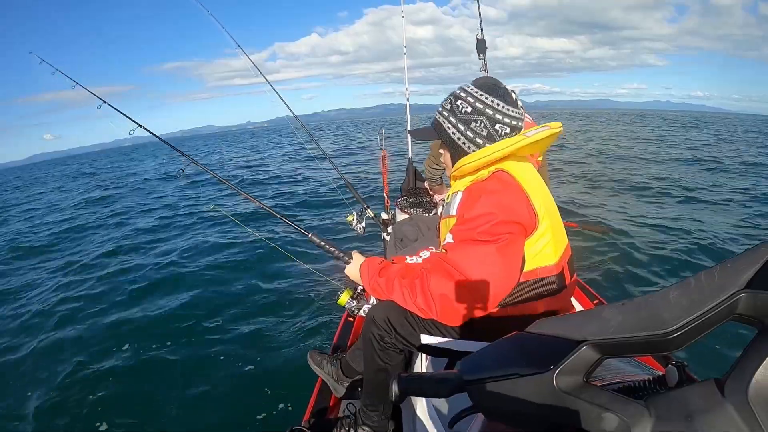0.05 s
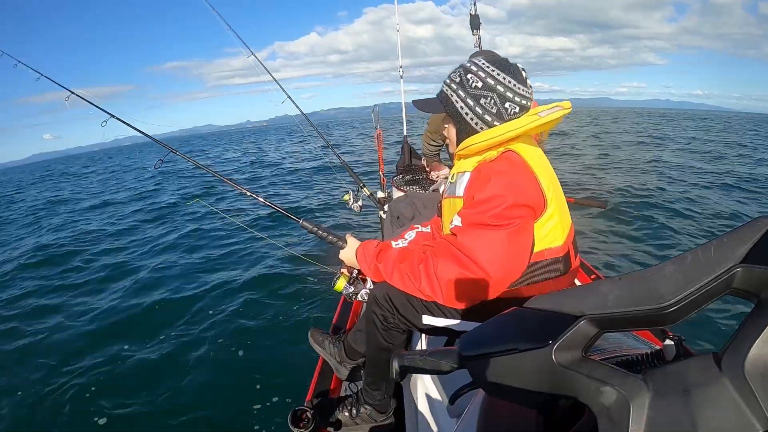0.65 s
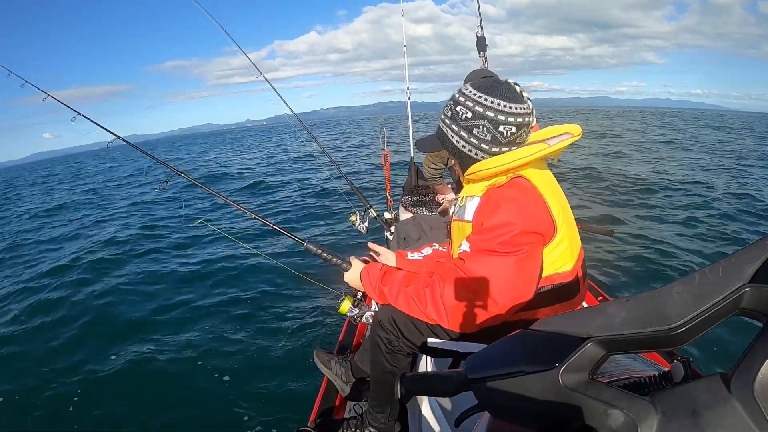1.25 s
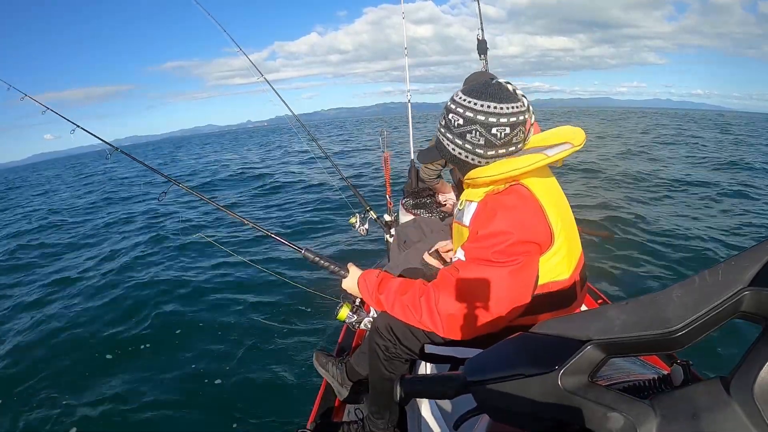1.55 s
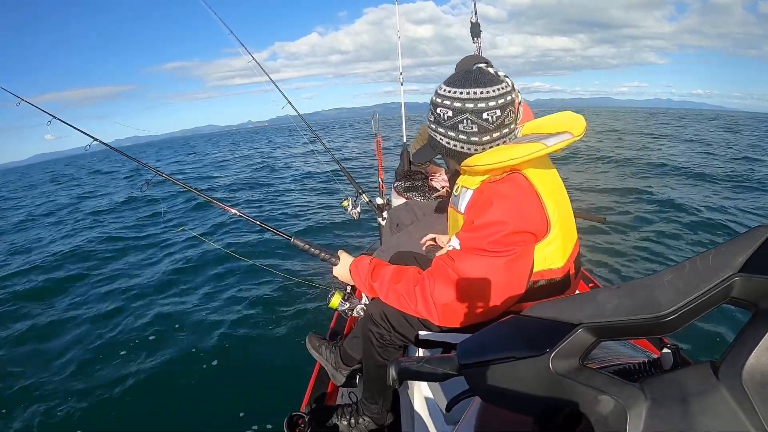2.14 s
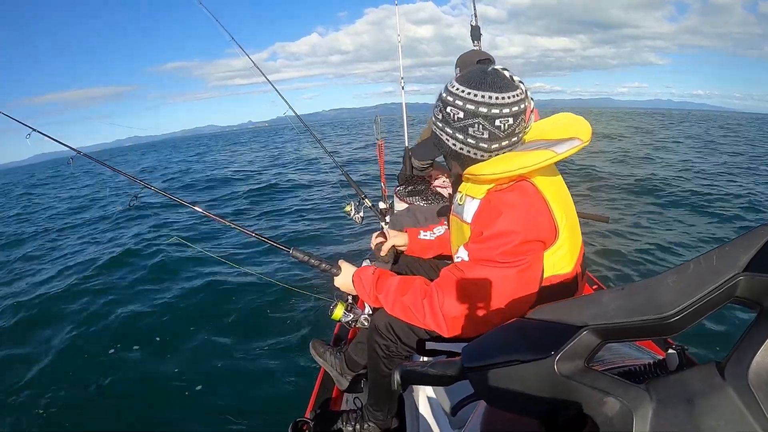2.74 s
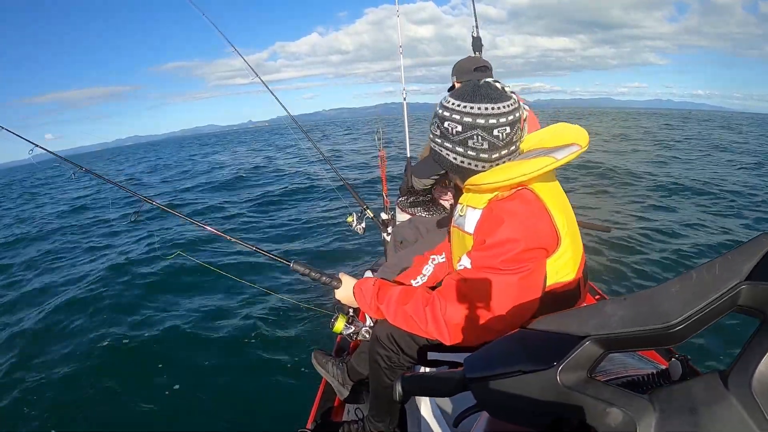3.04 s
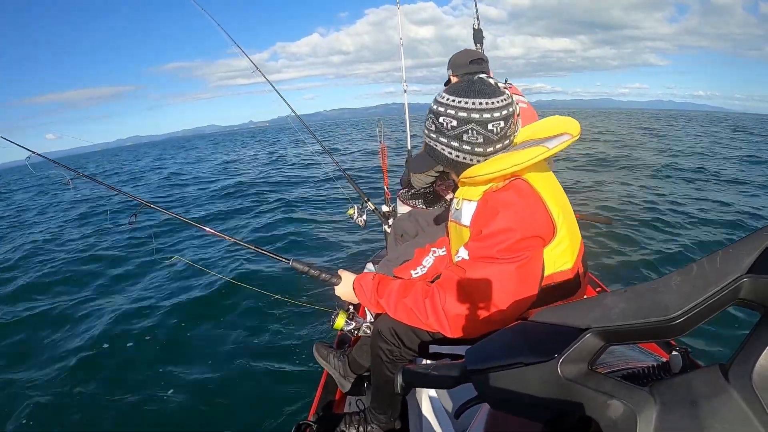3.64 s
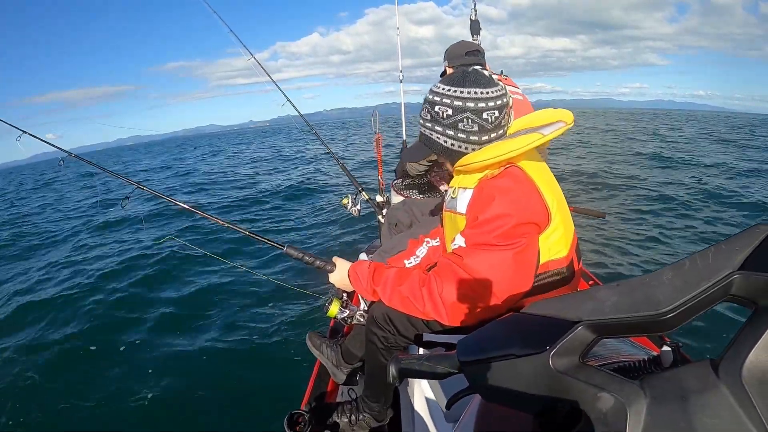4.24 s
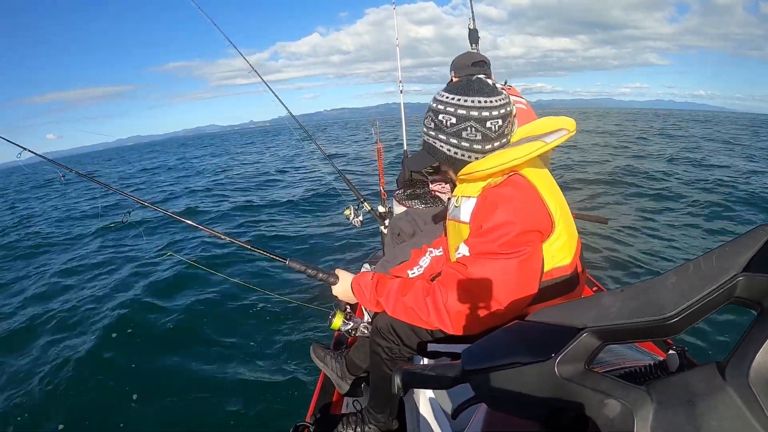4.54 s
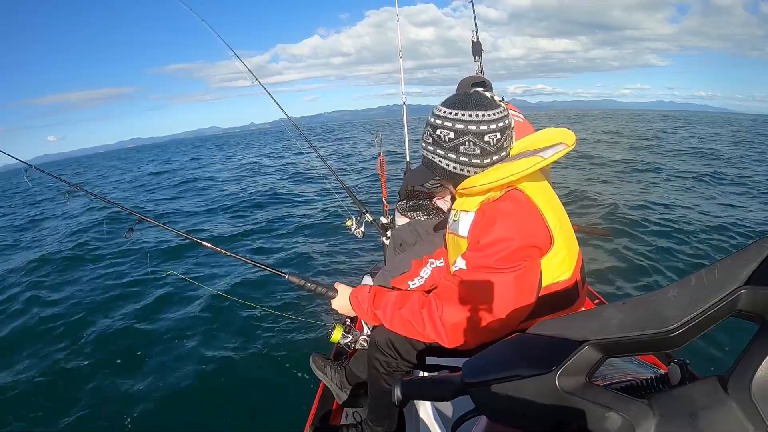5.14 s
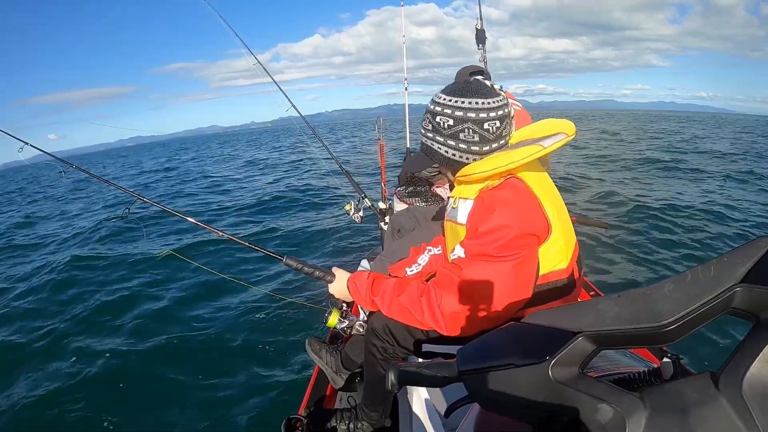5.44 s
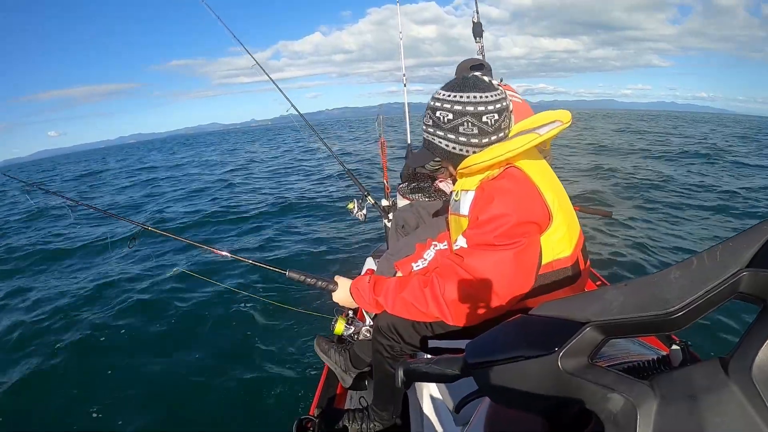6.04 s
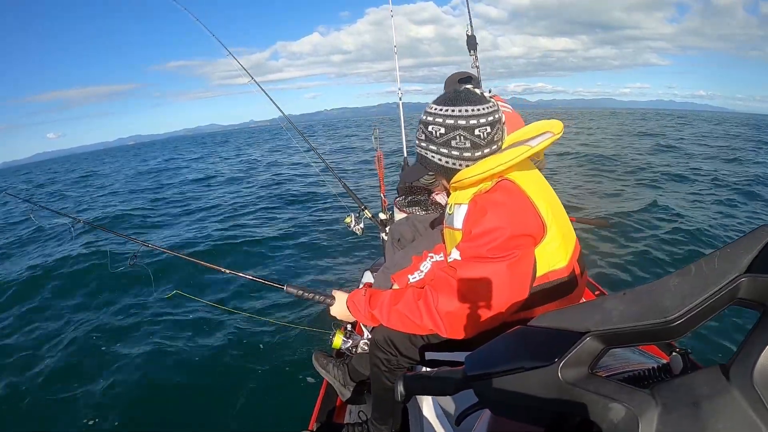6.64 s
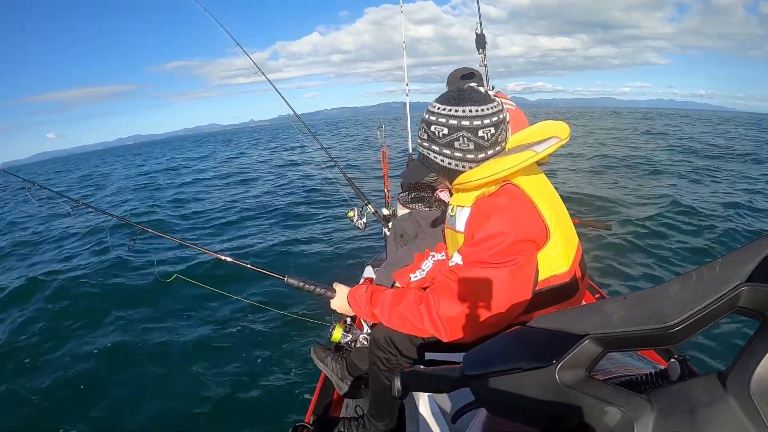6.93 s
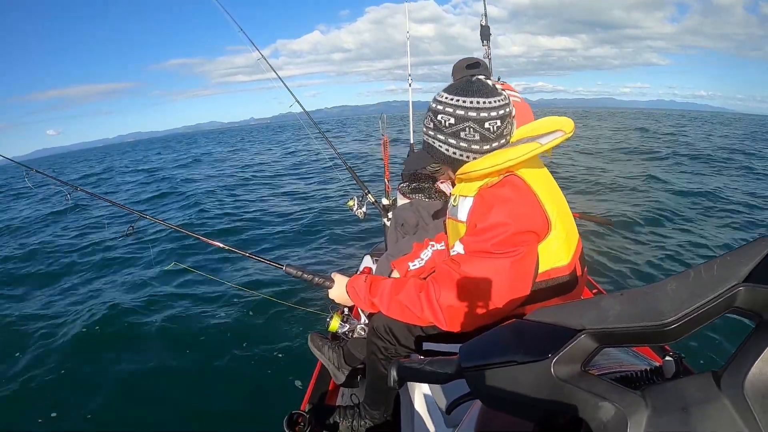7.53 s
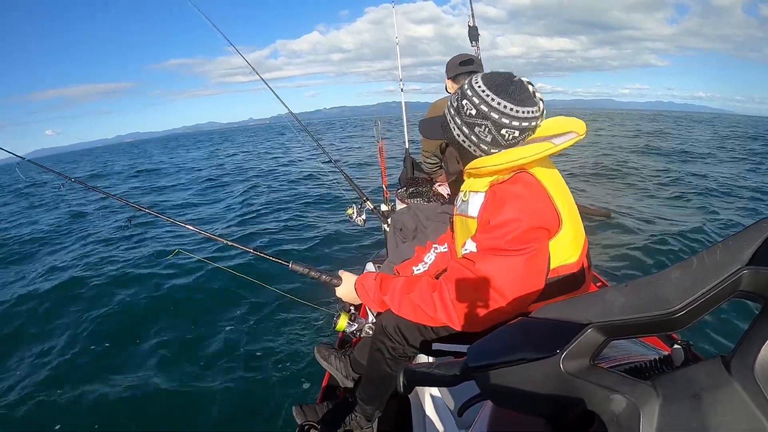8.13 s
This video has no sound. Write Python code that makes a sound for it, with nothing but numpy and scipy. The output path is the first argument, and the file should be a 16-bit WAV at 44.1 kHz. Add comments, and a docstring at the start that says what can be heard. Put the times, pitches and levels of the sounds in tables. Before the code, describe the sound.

Wind buffets the microphone in uneven low gusts as sea water laps close by against a small boat. Sharp little splashes, plops and hollow glugs arrive in loose clusters over soft gurgling and fizzing. After two early slaps there is a lull with dull wind thumps, then the water grows busier, hits hardest in the second half and goes on knocking at the hull to the end.

```python
"""A small craft drifts on a choppy sea, engine off. From the start wind buffets the microphone,
foam fizzes and water gurgles. Wavelets slap the hull: each throws a crackle of small bubbles,
then traps a pocket of air that knocks and glugs. Strong slaps land near 1 s and 2 s; a lull follows,
with eddies thumping the microphone. Slaps bunch again at 4.5-5 s, hardest at 6.1-6.5 s,
and keep coming until 8.3 s."""
import sys
import numpy as np
from scipy import signal
from scipy.fft import rfft, irfft, next_fast_len
from scipy.io import wavfile
from scipy.ndimage import uniform_filter1d

SR = 44100
rng = np.random.default_rng(int(sys.argv[2]) if len(sys.argv) > 2 else 0)


def transcribe(u):
    """Save the signal u as a 16-bit wav file named by the first command-line argument.

    u: samples, shape (n,) or (channels, n), limited to [-1, 1]; the rate is SR.
    q: integer samples, one column per channel.
    """
    v = np.clip(np.atleast_2d(u).T, -1, 1)
    q = np.round(v * 32767).astype(np.int16)
    wavfile.write(sys.argv[1], SR, q)


N = 369558
TIME_S = np.arange(N) / SR
BINS_HZ = np.maximum(np.fft.rfftfreq(next_fast_len(N + 8192, real=True) // 2 * 2, 1 / SR), 1)
SIDES = np.array([[1], [-1]])  # left, right microphone port

# Source spectra: freq_hz, density_db
RIPPLE_SPECTRUM = [(180, 15), (300, 2.5), (637, -11), (814, -6), (1060, -5), (1440, -2.5), (1910, -11),
                   (2280, -25.5), (8460, -22.5), (12500, -50), (15000, -43)]
EDDY_SPECTRUM = [(11, -34), (18, 0), (34, -1), (56, -3), (78, -6), (168, -22), (215, -45), (292, -47),
                 (391, -55), (648, -53), (700, -55), (910, -68), (1540, -120)]
FOAM_SPECTRUM = [(2200, 2.5), (3300, 2.5), (5000, 0.5), (6500, -5), (8300, -9.5), (10500, -18),
                 (15000, -27)]
GURGLE_SPECTRUM = [(500, -3), (800, -7), (1100, 6.5), (1600, 3.5), (2300, 0.5), (3300, -9.5), (4500, -28)]
BOOM_SPECTRUM = [(70, -2.5), (105, -6), (150, -13.5), (220, -20)]
SLOSH_SPECTRUM = [(110, 1.5), (170, 3.5), (280, -3), (450, -8.5), (700, -22.5), (1000, -27)]
SPRAY_SPECTRUM = [(3000, 10), (4200, 4.5), (6000, -6), (8000, -7), (11000, -19.5), (15000, -54)]
SPLASH_SPECTRUM = [(600, 1), (1000, 3), (1700, 8), (2500, 0.5), (3500, -8), (5000, -27.5)]
# Shading between ports: freq_hz, left_minus_right_db
PORT_SHADING = [(250, -1.5), (1000, -1), (2000, 0.8), (4000, 1), (8000, -3.5), (13000, -3.5)]
# Water sound reaches the right port first: freq_hz, lead_rad
RIGHT_LEAD = [(200, .06), (1000, 0.067), (2000, 0.72), (4000, 0.73), (8000, 1)]
# Deck reflections against direct sound: freq_hz, gain_db
DECK_SCATTER = [(150, -36.5), (500, -18.5), (1000, -14), (2000, -18.5), (4000, -20), (8000, -25),
                (13000, -1.5)]

# Levels below are relative within each table.
# Wind strength: time_s, level_db
GUSTS = [(0.0, -46), (0.09, -34.5), (1.12, -32.5), (1.98, -44.5), (2.31, -30), (2.45, -35.5), (2.63, -24.5),
         (2.66, -35.5), (2.78, -40), (3.38, -29.5), (3.62, -41), (3.66, -32.5), (4.34, -38.5),
         (4.46, -29.5), (4.95, -38.5), (5.06, -31), (5.23, -55), (5.41, -39.5), (6.51, -35), (7.12, -37),
         (7.14, -30.5), (7.89, -32), (7.96, -25), (8.12, -45), (8.19, -32.5), (8.38, -50)]
# Single eddies: centre_s, level_db, half_width_s
EDDY_THUMPS = [(2.353, -17.5, 0.0048), (2.622, -21, 0.0035), (3.205, -16, 0.0085), (3.31, -16.5, 0.0031),
               (5.055, -9.5, 0.0044), (5.844, -14, 0.008), (6.409, -13.5, 0.009), (7.328, -29, 0.0086),
               (7.959, -14, 0.0044)]
# Waves along the hull: crest_s, level_db, swell_s, drain_s, foam_offset_db
HULL_WAVES = [(0.17, -67.5, 0.2, 0.13, 3), (0.76, -65, 0.09, 0.052, -1), (0.991, -60.5, 0.097, 0.097, 2),
              (1.56, -68.5, 0.24, 0.18, -5), (2.03, -58, 0.28, 0.052, -1), (2.92, -56.5, 0.25, 0.36, -6.5),
              (3.08, -64.5, 0.011, 0.11, 1.5), (3.73, -64, 0.057, 0.14, -15.5),
              (2.47, -67, 0.04, 0.043, -7), (4.25, -77.5, 0.094, 0.13, -17), (6.85, -71, 0.092, 0.06, -0.5),
              (4.58, -81, 0.12, 0.1, 5), (4.95, -59, 0.24, 0.12, -3.5), (5.78, -62, 0.13, 0.17, -12),
              (6.218, -54, 0.061, 0.15, -4.5), (6.45, -62, 0.22, 0.072, -15),
              (7.19, -56.5, 0.16, 0.17, -12), (7.57, -54.5, 0.14, 0.27, -8.5),
              (8.25, -55.5, 0.16, 0.12, -11)]
# Closing cavities: start_s, level_db, first_hz, last_hz, length_s
CAVITIES = [(0.192, -44, 451, 724, 0.044), (0.229, -38.5, 793, 2250, 0.026),
            (0.626, -52.5, 918, 1365, 0.041), (1.387, -51, 1100, 1360, 0.028),
            (1.517, -50.5, 1467, 1750, 0.066), (1.988, -27, 870, 1116, 0.019),
            (2.4, -48.5, 874, 1000, 0.025), (3.43, -45, 463, 570, 0.043), (4.015, -60.5, 718, 1010, 0.14),
            (4.075, -60, 1225, 1590, 0.055), (4.516, -32, 563, 623, 0.013), (4.819, -36.5, 668, 780, 0.045),
            (4.178, -56, 850, 1450, 0.051), (5.108, -49, 1410, 4230, 0.02), (5.245, -52.5, 714, 990, 0.054),
            (7.503, -35.5, 696, 710, 0.034), (8.267, -32.5, 3360, 6100, 0.0053)]
# Heavy water on the hull: crest_s, level_db, fade_s
HULL_HEAVES = [(1.14, -31, 0.059), (4.52, -40, 0.14), (6.13, -36, 0.073), (6.389, -30, 0.048),
               (7.34, -35.5, 0.028), (7.6, -39, 0.055), (7.94, -39, 0.037)]
# Air trapped under the hull: start_s, level_db, pitch_hz, t60_s
AIR_POCKETS = [(0.143, -28, 317, 0.15), (0.389, -25, 394, 0.034), (0.879, -25, 474, 0.066),
               (0.99, -28.5, 319, 0.086), (1.022, -11.5, 249, 0.079), (1.051, -31, 237.3, 0.28),
               (1.122, -28, 217, 0.099), (1.17, -29.5, 169, 0.16), (1.847, -24.5, 364, 0.044),
               (1.965, -25, 222, 0.088), (2.098, -26.5, 393, 0.047), (2.882, -31, 230, 0.08),
               (3.411, -30.5, 219, 0.18), (3.676, -28.5, 280, 0.041), (4.002, -40, 547, 0.15),
               (4.412, -28.5, 171, 0.1), (4.523, -20, 316.4, 0.086), (4.66, -27, 147.6, 0.16),
               (4.736, -41.5, 313, 0.45), (4.797, -27, 555, 0.081), (4.824, -32.5, 304, 0.11),
               (5.022, -28.5, 345, 0.035), (5.263, -35.5, 614, 0.054), (5.438, -33, 454, 0.032),
               (6.11, -26.5, 275, 0.047), (6.137, -31, 232, 0.091), (6.231, -38, 286, 0.12),
               (6.383, -24, 230, 0.08), (6.434, -37, 338, 0.07), (6.764, -30.5, 185.5, 0.12),
               (6.95, -34, 487, 0.035), (7.149, -26.5, 302, 0.068), (7.322, -29, 174, 0.12),
               (7.513, -22.5, 560, 0.047), (7.553, -30, 340, 0.076), (7.778, -33, 285.5, 0.17),
               (8.015, -33.5, 462, 0.12)]
# Small bubbles snapping shut: start_s, level_db, pitch_hz
PINCH_OFFS = [(0.3653, -33, 1610), (0.8692, -33.5, 1300), (0.9953, -24.5, 1420), (1.8829, -30.5, 1920),
              (1.9109, -33.5, 1440), (1.9948, -16, 1540), (1.997, -26, 1000), (1.998, -21.5, 2880),
              (1.9655, -36, 1700), (2.447, -48, 2270), (2.8814, -33, 1780), (2.928, -28.5, 1510),
              (2.966, -29, 2350), (3.656, -37, 2020), (4.5113, -21, 1360), (4.6482, -19.5, 1550),
              (4.6558, -20, 2070), (4.784, -27, 1730), (4.7942, -20.5, 1670), (4.8288, -28, 1660),
              (4.9367, -30, 1080), (5.0466, -29.5, 1780), (6.1306, -14, 1610), (6.13, -44, 3260),
              (5.817, -41, 2400), (6.1483, -20, 1380), (6.1556, -19, 1460), (6.1934, -26.5, 1630),
              (6.3616, -24.5, 1050), (6.3777, -21, 1900), (6.4442, -23, 1040), (6.452, -13.5, 1620),
              (6.996, -33, 1140), (7.027, -41.5, 1940), (7.097, -38.5, 930), (7.1518, -29.5, 2650),
              (7.218, -35.5, 746), (7.2489, -30.5, 945), (7.405, -35, 2090), (7.45, -36.5, 1200),
              (7.6292, -29.5, 1630), (7.6421, -23.5, 2580), (7.9272, -19.5, 1500), (8.0115, -35, 1340),
              (8.251, -23, 1850), (8.2853, -23, 1810), (8.298, -27, 1660)]
# Wavelets breaking on the hull: crest_s, level_db, swell_s, fade_s, slosh_offset_db, spray_offset_db
WAVELETS = [(0.018, -50, 0.017, 0.0038, 7, -27), (0.115, -41, 0.004, 0.0064, 7, -12),
            (0.134, -29, 0.0026, 0.0032, -11.5, -4.5), (0.366, -34, 0.0018, 0.0018, 6.5, -3),
            (0.874, -33.5, 0.0023, 0.0082, -9, -13), (0.98, -34.5, 0.0019, 0.0062, -16, -27),
            (1.001, -21.5, 0.0011, 0.0052, -8, -17), (1.018, -32.5, 0.0045, 0.0092, 4, -2),
            (1.088, -40.5, 0.0058, 0.0044, 7, -11), (1.116, -45, 0.0069, 0.054, 9, -33),
            (1.51, -47, 0.012, 0.076, 5.5, -22.5), (1.804, -41, 0.002, 0.005, 0.5, 0.5),
            (1.966, -37.5, 0.0017, 0.02, 5, -8.5), (2, -25.5, 0.0078, 0.0043, -16, -40),
            (2.015, -29, 0.005, 0.0069, -11, -10.5), (2.098, -39, 0.011, 0.003, -1, -11.5),
            (2.834, -41, 0.0058, 0.0039, 11, -22), (2.883, -43, 0.002, 0.045, 11, -28),
            (3.055, -52.5, 0.012, 0.017, 13, -5), (3.436, -33.5, 0.00081, 0.0023, 1.5, -4),
            (3.824, -38, 0.0038, 0.0024, -3.5, -5.5), (4.521, -32, 0.0033, 0.008, 6, 2),
            (4.738, -31, 0.0026, 0.0014, -2, -15), (4.786, -29.5, 0.0017, 0.0089, 0.5, -11.5),
            (4.827, -35, 0.0076, 0.016, -5, -10.5), (4.942, -37, 0.017, 0.018, -31, -15),
            (5.044, -43.5, 0.012, 0.023, -11, -22), (5.261, -46.5, 0.0077, 0.0083, -10, -33),
            (5.438, -47, 0.0042, 0.002, 4.5, -19), (6.107, -33, 0.0027, 0.0053, 8.5, -16.5),
            (6.133, -28, 0.011, 0.0083, -4, -7), (6.1571, -22, 0.001, 0.0026, -37, -21),
            (6.225, -36.5, 0.0079, 0.0058, -18, -7), (6.362, -30, 0.0046, 0.008, -13, -10),
            (6.38, -20, 0.0082, 0.0033, -9, -12), (6.391, -41.5, 0.0051, 0.063, -1.5, -14),
            (6.435, -31.5, 0.0098, 0.0084, 7.5, -10.5), (6.829, -40, 0.0025, 0.0022, 1.5, -26.5),
            (7.151, -35.5, 0.0018, 0.0055, 7.5, -9), (7.246, -44.5, 0.011, 0.0026, 12, 1.5),
            (7.514, -33, 0.0013, 0.015, -1.5, -14.5), (7.564, -35.5, 0.013, 0.012, 2, -9),
            (7.903, -35, 0.0063, 0.0075, -4, -20), (7.923, -26.5, 0.0096, 0.005, 0, -1.5),
            (8.267, -29, 0.00081, 0.0014, -16, 6), (8.283, -38.5, 0.0018, 0.0068, 0, -2.5)]


def from_db(db):
    """Decibels to gain."""
    return 10 ** (np.asarray(db) / 20)


def unit_rms(x):
    """Scale to unit power."""
    return x / np.sqrt(np.mean(x ** 2) + 1e-20)


def at_hz(curve, hz=BINS_HZ):
    """Read a curve on a log-frequency axis."""
    freqs_hz, values = np.transpose(curve)
    return np.interp(np.log(hz), np.log(freqs_hz), values)


def shaped(x, gain):
    """Filter by a gain per frequency bin."""
    return irfft(rfft(x, 2 * len(BINS_HZ) - 2) * gain)[..., :N]


def drift(rate_hz):
    """Slow random curve, spread 1."""
    hop, settle = 40, 2000
    pole = np.exp(-2 * np.pi * rate_hz * hop / SR)
    white = rng.standard_normal(N // hop + settle + 2)
    slow = signal.lfilter([1], [1, -2 * pole, pole * pole], white)[settle:]
    return np.interp(np.arange(N) / hop, np.arange(len(slow)), unit_rms(slow))


def add(track, start_s, sound):
    """Mix a short sound in."""
    i = max(round(start_s * SR), 0)
    track[i:i + len(sound)] += sound[:max(N - i, 0)]


def burst(t, swell_s, fade_s):
    """Rounded rise to a crest at t = 0, then exponential fade."""
    return np.exp(-np.where(t < 0, (t / swell_s) ** 2, t / fade_s))


def ring(clicks, hz, t60_s):
    """Each click starts a decaying sine."""
    radius, step_rad = from_db(-60 / (t60_s * SR)), 2 * np.pi * hz / SR
    feedback = [1, -2 * radius * np.cos(step_rad), radius * radius]
    return signal.lfilter([0, np.sin(step_rad)], feedback, clicks + 1e-18)


def bubble(hz, t60_s, rise):
    """One ringing bubble; pitch climbs as it nears the surface."""
    t = TIME_S[:int(t60_s * SR)]
    pitch_hz = hz * (1 + rise * t / t60_s)
    return from_db(-60 * t / t60_s) * np.sin(2 * np.pi * np.cumsum(pitch_hz) / SR)


def bubble_cloud(spectrum, per_s, cycles, spread_db, patchy_db, bands=28):
    """Bubbles of many sizes, born in random swarms, each ringing for some cycles; rms 1."""
    out, candidates = np.zeros(N), 8000
    low_hz, high_hz = spectrum[0][0], spectrum[-1][0]
    odds = per_s * N / SR / bands / candidates
    for hz in np.geomspace(low_hz, high_hz, bands):
        when, chance, size, polarity = rng.random((4, candidates))
        swarm = np.interp(when, np.linspace(0, 1, 200), rng.standard_normal(200))
        strength_db = spread_db * np.minimum(-np.log(size), 4) + patchy_db * swarm
        kicks = from_db(strength_db) * np.sign(polarity - 0.5) * (chance < odds)
        births = np.bincount((when * N).astype(int), kicks, N)
        out += unit_rms(ring(births, hz, cycles / hz)) * from_db(at_hz(spectrum, hz)) * np.sqrt(hz)
    return unit_rms(signal.sosfilt(signal.butter(2, low_hz / 2, "high", fs=SR, output="sos"), out))


def echoes(x, decay_s):
    """Dense, short reflections of unit energy."""
    t = TIME_S[:SR // 4]
    tail = rng.standard_normal(len(t)) * np.exp(-t / decay_s) * np.minimum(2 * t / decay_s, 1)
    return signal.fftconvolve(x, tail / np.linalg.norm(tail))[:N]


def ports(x, windscreen_hz=11200):
    """Each port has its own shading; the windscreen dulls the treble."""
    shaded = shaped(x, from_db(SIDES * at_hz(PORT_SHADING) / 2))
    return signal.sosfilt(signal.butter(3, windscreen_hz, fs=SR, output="sos"), shaded)


def across_deck(x, decay_s):
    """Mono to stereo: direct sound, right side first, plus deck reflections."""
    direct = shaped(x, np.exp(-0.5j * SIDES * at_hz(RIGHT_LEAD)))
    reflections = np.array([echoes(x, decay_s) for _ in SIDES])
    return direct + shaped(reflections, from_db(at_hz(DECK_SCATTER)))


def open_sea(level_db):
    """Smooth hiss of ripples far and wide."""
    hiss = shaped(rng.standard_normal((2, N)), from_db(at_hz(RIPPLE_SPECTRUM)))
    return from_db(level_db) * unit_rms(hiss)


def wind(gain_db, left_bias_db, sway_db, lumpy_db, buffet_db, opposed, steady_s):
    """Eddies press on the ports in lumps, partly opposed; stronger wind tears into more small ones."""
    gust_db = np.interp(TIME_S, *np.transpose(GUSTS))
    white = rng.standard_normal((3, N))
    pressure = white[:2] + opposed * SIDES * white[2]
    eddies = unit_rms(shaped(pressure, from_db(at_hz(EDDY_SPECTRUM))))
    local_power = uniform_filter1d(eddies ** 2, int(steady_s * SR), axis=-1)
    eddies /= np.sqrt(local_power + 0.0089)
    large = shaped(eddies, 1 / (1 + (BINS_HZ / 100) ** 4))
    flutter_db = -10.5 + 0.63 * (gust_db - gust_db.mean()) + lumpy_db * drift(rate_hz=39)
    small = from_db(flutter_db) * (eddies - large)
    level_db = gain_db + gust_db + buffet_db * drift(rate_hz=8.8)
    balance_db = left_bias_db + sway_db * drift(rate_hz=5.4)
    return from_db(level_db + SIDES * balance_db / 2) * (large + small)


def thumps(right_share):
    """A passing eddy sucks at the left port and pushes weakly on the right."""
    suction = np.zeros(N)
    for centre_s, level_db, half_width_s in EDDY_THUMPS:
        u = np.linspace(-4, 4, int(8 * half_width_s * SR))
        pulse = (u ** 2 - 1) * np.exp(-u ** 2 / 2)
        add(suction, centre_s - 4 * half_width_s, from_db(level_db) * pulse)
    return np.array([suction, -right_share * suction])


def waves_db(resting_db, foam_share=0, lead_s=0):
    """Level of moving water: each wave builds and drains over a resting floor."""
    power = from_db(resting_db) ** 2
    for crest_s, level_db, swell_s, drain_s, foam_offset_db in HULL_WAVES:
        t = TIME_S - crest_s + lead_s
        envelope = np.exp(-np.maximum(-t / swell_s, t / drain_s))
        power = power + (from_db(level_db + foam_share * foam_offset_db) * envelope) ** 2
    return 10 * np.log10(power)


def foam(gain_db, side_db):
    """Tiny bubbles burst on both sides of the hull, louder with each wave."""
    level_db = gain_db + waves_db(resting_db=-85, foam_share=1)
    mid, side = [bubble_cloud(FOAM_SPECTRUM, per_s=5000, cycles=120, spread_db=5, patchy_db=4.5, bands=36)
                 for _ in range(2)]
    return from_db(level_db) * (mid + from_db(side_db) * SIDES * side)


def droplets(count, low_hz, high_hz, cycles, rise, spread_db):
    """Lone pitched bubbles and drips at random times."""
    out = np.zeros(N)
    for when, pitch, softness in rng.random((count, 3)):
        hz = low_hz * (high_hz / low_hz) ** pitch
        gain = from_db(-spread_db * softness) * np.sqrt(low_hz / hz)
        add(out, when * N / SR, gain * bubble(hz, cycles / hz, rise))
    return out


def spits(per_s, low_hz, high_hz, decay_s, spread_db):
    """Drops flung against the shell: dry ticks, mostly faint."""
    out, t, candidates = np.zeros(N), TIME_S[:SR // 100], 1200
    for when, chance, pitch, softness in rng.random((candidates, 4)):
        if chance < per_s * N / SR / candidates:
            hz = low_hz * (high_hz / low_hz) ** pitch
            tick = np.exp(-t / decay_s) * np.sin(2 * np.pi * hz * t)
            add(out, when * N / SR, from_db(-spread_db * np.sqrt(softness)) * tick)
    return out


def wash(lapping_db, spurt_db, churn_db, gurgle_db, drip_db, spit_db, churn_lead_s):
    """Bubbles, drips and ticks spurt along the waterline with the waves; the deep churn leads."""
    spurts = from_db(spurt_db * drift(rate_hz=16))
    churn = bubble_cloud(SLOSH_SPECTRUM, per_s=700, cycles=25.6, spread_db=5, patchy_db=4.5)
    gurgle = bubble_cloud(GURGLE_SPECTRUM, per_s=1500, cycles=32, spread_db=2, patchy_db=3)
    drips = droplets(count=200, low_hz=749, high_hz=3760, cycles=45, rise=0.5, spread_db=12)
    ticks = spits(per_s=65, low_hz=1330, high_hz=3800, decay_s=0.00082, spread_db=18.5)
    deep = from_db(churn_db + waves_db(lapping_db, lead_s=churn_lead_s)) * churn
    surface = from_db(gurgle_db) * gurgle + from_db(drip_db) * drips + from_db(spit_db) * ticks
    return spurts * (deep + from_db(waves_db(lapping_db)) * surface)


def chirps(gain_db, roughness, tremble_hz):
    """A shrinking, trembling cavity whistles upward, faster and faster."""
    sweeps = np.zeros(N, complex)
    for start_s, level_db, first_hz, last_hz, length_s in CAVITIES:
        progress = np.linspace(0, 1, int(length_s * SR))
        pitch_hz = 1 / ((1 - progress) / first_hz + progress / last_hz)
        envelope = from_db(level_db) * np.sin(np.pi * progress) ** 2
        add(sweeps, start_s, envelope * np.exp(2j * np.pi * np.cumsum(pitch_hz) / SR))
    tremble = 1 + roughness * (drift(tremble_hz) + 1j * drift(tremble_hz))
    return from_db(gain_db) * np.real(sweeps * tremble)


def heaves(gain_db):
    """The weight of a wave sets the hull booming."""
    push = sum(from_db(level_db) * burst(TIME_S - crest_s, swell_s=0.039, fade_s=fade_s)
               for crest_s, level_db, fade_s in HULL_HEAVES)
    boom = bubble_cloud(BOOM_SPECTRUM, per_s=900, cycles=18, spread_db=6.5, patchy_db=-1.5, bands=8)
    return from_db(gain_db) * push * boom


def hollow_hull(knocks, echo_db, decay_s):
    """The shell booms on briefly after a knock."""
    return knocks + from_db(echo_db) * echoes(knocks, decay_s)


def glugs(gain_db, attack_cycles, rise, wobble, upper_ratio, upper_db):
    """Trapped air swells into a low ring; its shifting shape bends the pitch and adds an upper mode."""
    out, t = np.zeros(N), TIME_S[:SR // 3]
    shifting = drift(rate_hz=76)
    for start_s, level_db, pitch_hz, t60_s in AIR_POCKETS:
        shape = np.roll(shifting, -round(start_s * SR))[:len(t)]
        bend = 1 + rise * (np.minimum(t / t60_s, 1) - 0.2) + wobble * shape
        cycles = np.cumsum(pitch_hz * bend) / SR
        attack = 1 - np.exp(-(cycles / attack_cycles) ** 2)
        modes = np.sin(2 * np.pi * cycles) + from_db(upper_db) * np.sin(2 * np.pi * upper_ratio * cycles)
        add(out, start_s, from_db(level_db - 60 * t / t60_s) * attack * modes)
    return from_db(gain_db) * out


def plops(gain_db, cycles, rise, swell_s, crack_db, snap_db, snap_s, snap_band_hz):
    """A bubble pinches off with a sharp crack and a snap of spray, then rings."""
    tones, snaps, t = np.zeros(N), np.zeros(N), TIME_S[:SR // 20]
    crack = bubble(hz=2690, t60_s=0.0034, rise=0)
    attack = 1 - np.exp(-t / swell_s)
    snap_envelope = burst(t - snap_s, snap_s / 2, snap_s)
    for start_s, level_db, pitch_hz in PINCH_OFFS:
        tone = bubble(pitch_hz, cycles / pitch_hz, rise)
        add(tones, start_s, from_db(level_db) * tone * attack[:len(tone)])
        add(tones, start_s, from_db(level_db + crack_db) * crack)
        add(snaps, start_s, from_db(0.5 * level_db) * snap_envelope * rng.standard_normal(len(t)))
    snaps = signal.sosfilt(signal.butter(2, snap_band_hz, "band", fs=SR, output="sos"), snaps)
    return from_db(gain_db) * tones + from_db(snap_db) * snaps


def slaps(splash_db, slosh_db, lag_s, linger_s):
    """A wavelet tears into small bubbles and spray at once; the heavy slosh lags and lingers."""
    splash_gain, spray_gain, slosh_gain = np.zeros((3, N))
    window_s = np.arange(-SR // 10, SR // 4) / SR
    for crest_s, level_db, swell_s, fade_s, slosh_offset_db, spray_offset_db in WAVELETS:
        t = window_s[window_s >= -crest_s]
        start_s = crest_s + t[0]
        crest = burst(t, swell_s, fade_s)
        surge = burst(t - lag_s, swell_s + lag_s / 2, fade_s + linger_s)
        add(splash_gain, start_s, from_db(level_db + splash_db) * crest)
        add(spray_gain, start_s, from_db(level_db + spray_offset_db) * crest)
        add(slosh_gain, start_s, from_db(level_db + slosh_db + slosh_offset_db) * surge)
    splash = bubble_cloud(SPLASH_SPECTRUM, per_s=3200, cycles=68, spread_db=3.5, patchy_db=0)
    spray = bubble_cloud(SPRAY_SPECTRUM, per_s=5700, cycles=24, spread_db=7.5, patchy_db=5)
    slosh = bubble_cloud(SLOSH_SPECTRUM, per_s=1500, cycles=9.4, spread_db=0, patchy_db=-2)
    return splash_gain * splash + spray_gain * spray + slosh_gain * slosh


def scene():
    """Water at the hull, the sea around it, wind on the microphone."""
    knocks = glugs(gain_db=4, attack_cycles=1.01, rise=0.022, wobble=0.084,
                   upper_ratio=1.9, upper_db=-23.5)
    water = slaps(splash_db=-2.5, slosh_db=-1, lag_s=0.0028, linger_s=0.015)
    water += plops(gain_db=3, cycles=17.5, rise=0.082, swell_s=0.00014, crack_db=-10.5,
                   snap_db=-25, snap_s=0.0017, snap_band_hz=(1800, 4600))
    water += hollow_hull(knocks, echo_db=-12.5, decay_s=0.03)
    water += heaves(gain_db=2.5)
    water += chirps(gain_db=1, roughness=0.73, tremble_hz=96)
    water += wash(lapping_db=-77.5, spurt_db=1.55, churn_db=12.5, gurgle_db=4, drip_db=19.5,
                  spit_db=27, churn_lead_s=0.034)
    mix = ports(across_deck(water, decay_s=0.016) + foam(gain_db=3, side_db=-1.5))
    mix += open_sea(level_db=-57)
    mix += wind(gain_db=2.5, left_bias_db=6.5, sway_db=3, lumpy_db=3.5, buffet_db=3,
                opposed=0.47, steady_s=0.086)
    return mix + thumps(right_share=0.23)


def record(dry):
    """The microphone drops the deepest rumble and the top."""
    low_cut = signal.butter(2, 14, "high", fs=SR, output="sos")
    high_cut = signal.cheby2(14, 70, 16100, fs=SR, output="sos")
    return signal.sosfilt(high_cut, signal.sosfilt(low_cut, dry))


dry = scene()
out = record(dry)
transcribe(out)
```